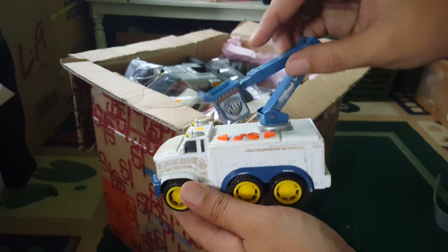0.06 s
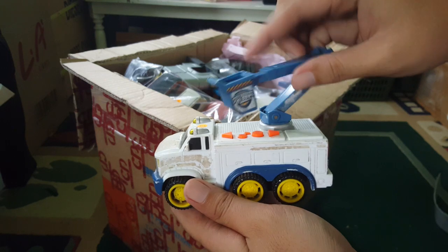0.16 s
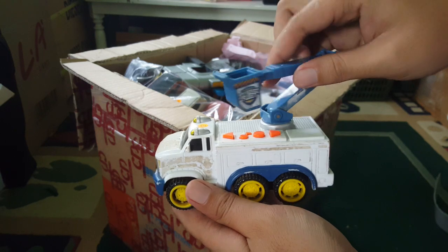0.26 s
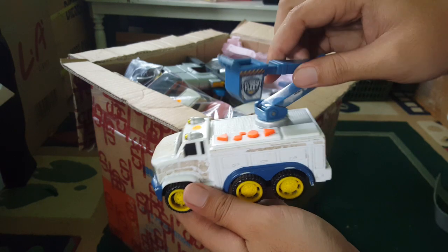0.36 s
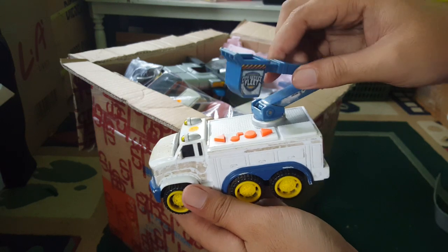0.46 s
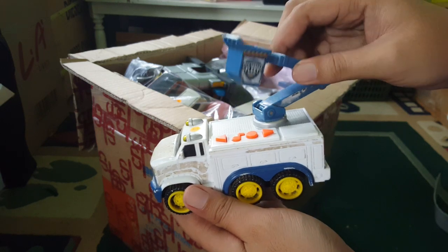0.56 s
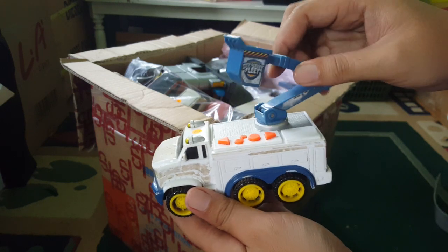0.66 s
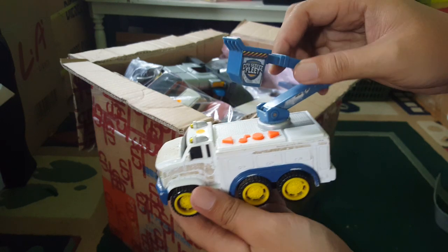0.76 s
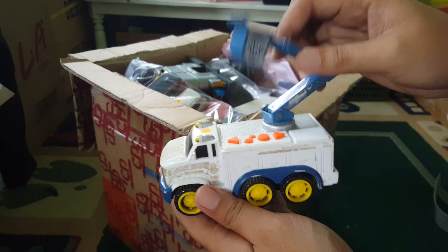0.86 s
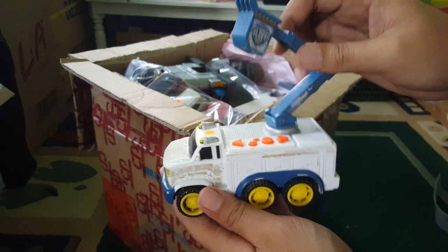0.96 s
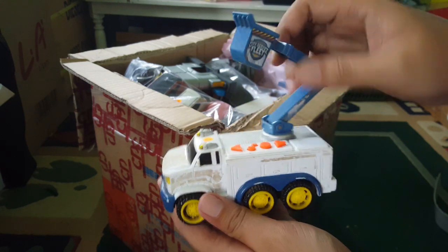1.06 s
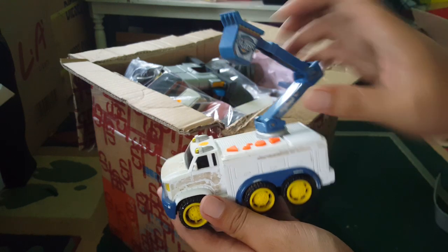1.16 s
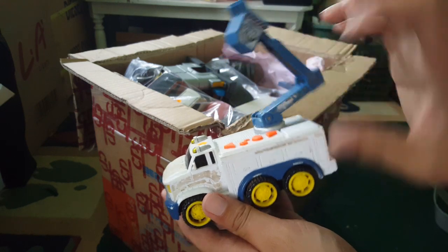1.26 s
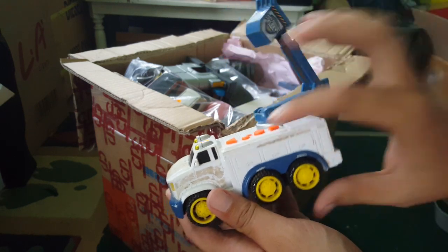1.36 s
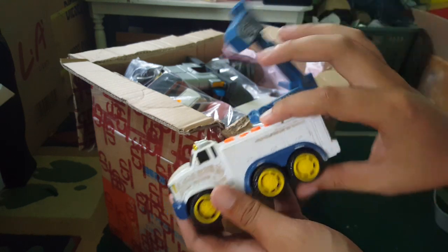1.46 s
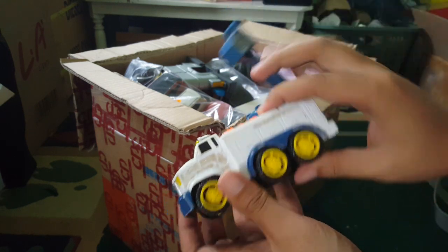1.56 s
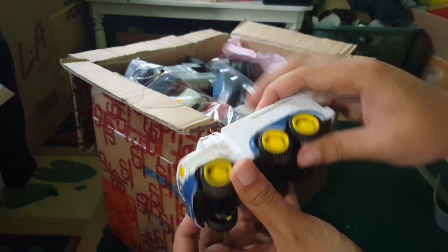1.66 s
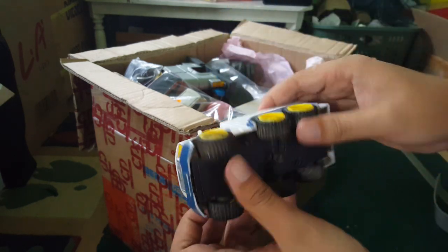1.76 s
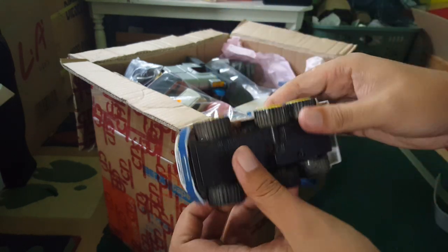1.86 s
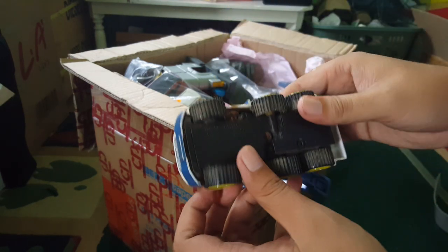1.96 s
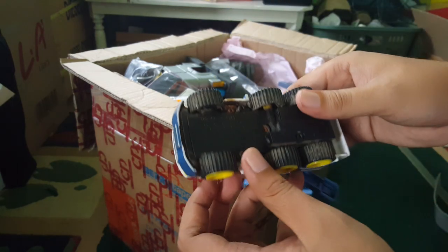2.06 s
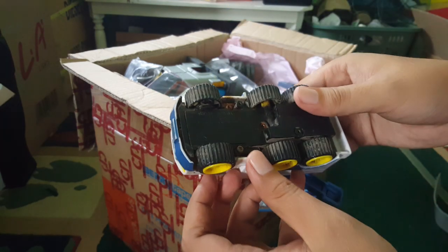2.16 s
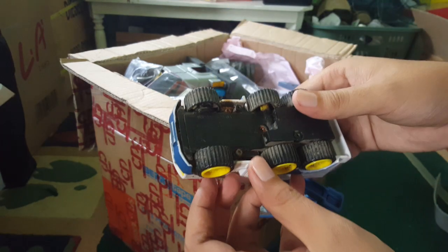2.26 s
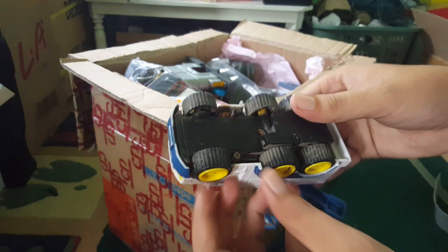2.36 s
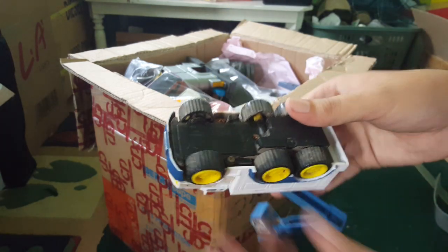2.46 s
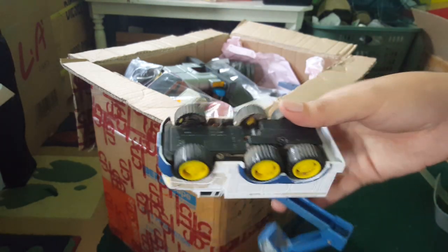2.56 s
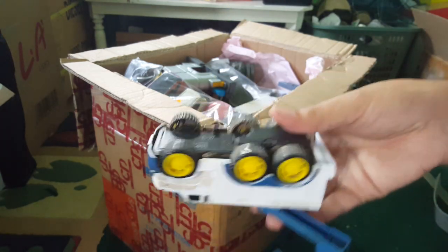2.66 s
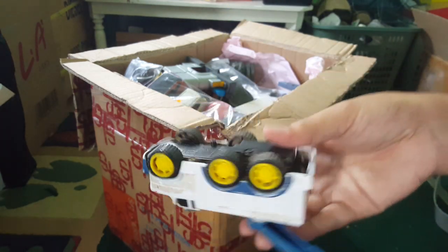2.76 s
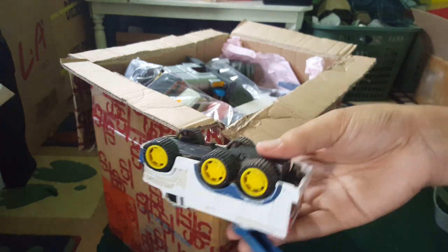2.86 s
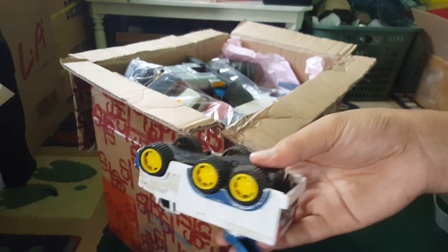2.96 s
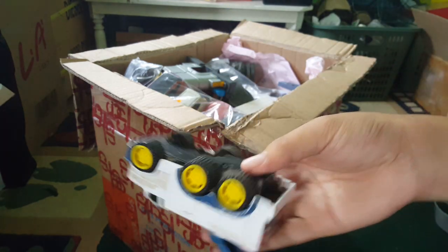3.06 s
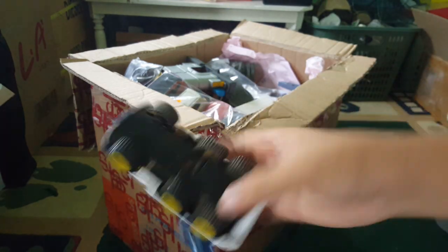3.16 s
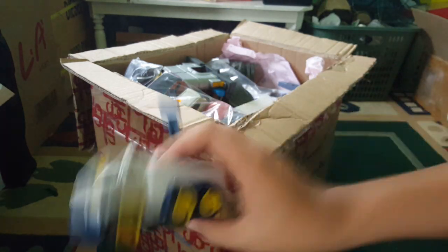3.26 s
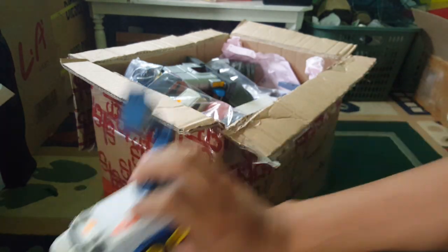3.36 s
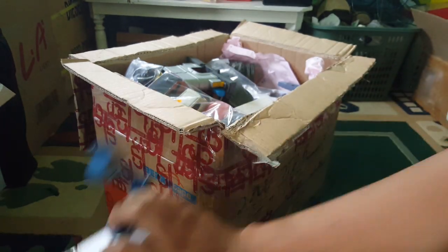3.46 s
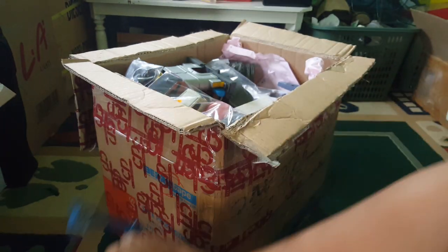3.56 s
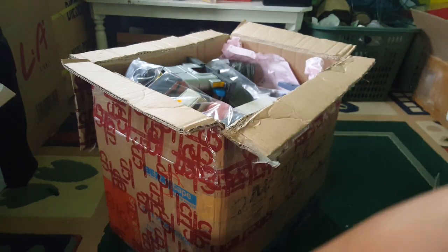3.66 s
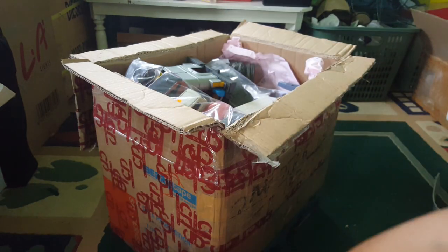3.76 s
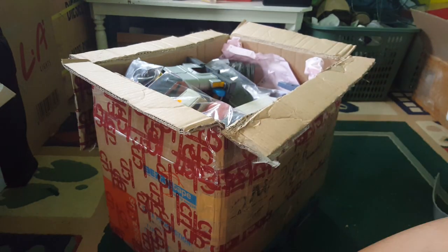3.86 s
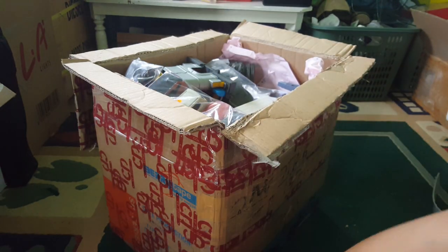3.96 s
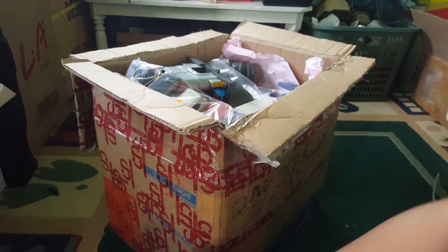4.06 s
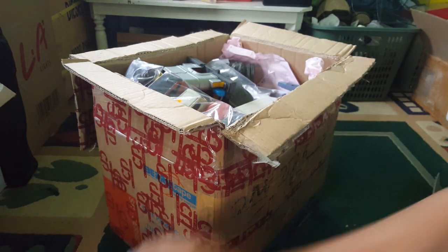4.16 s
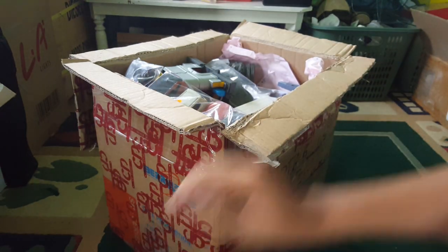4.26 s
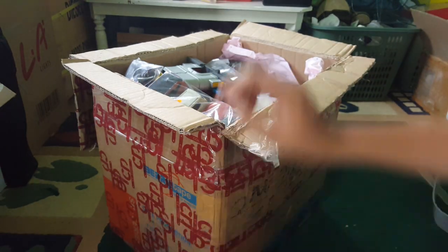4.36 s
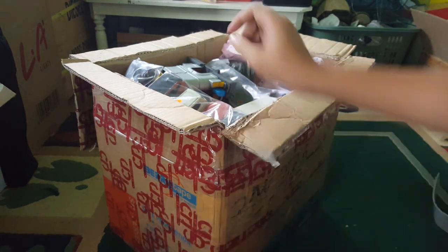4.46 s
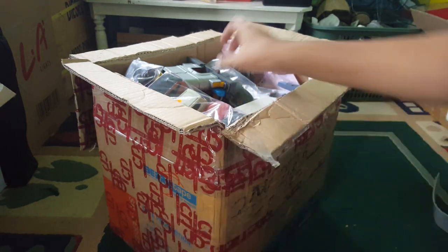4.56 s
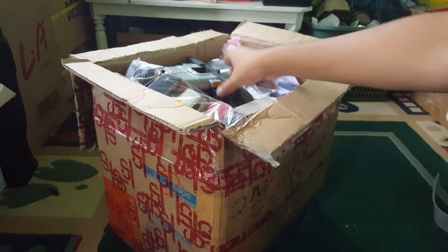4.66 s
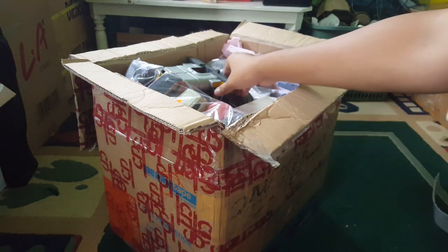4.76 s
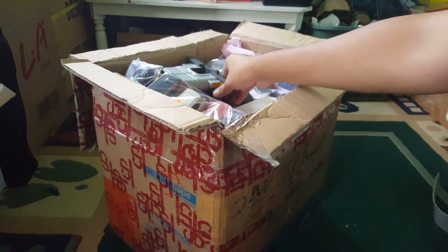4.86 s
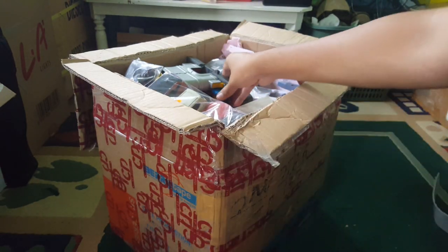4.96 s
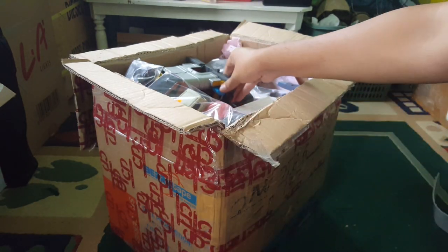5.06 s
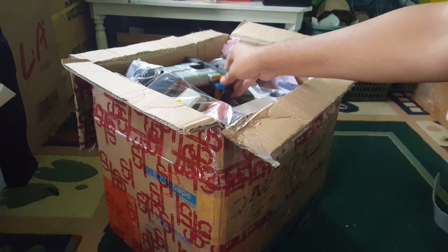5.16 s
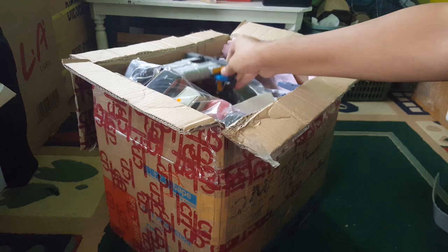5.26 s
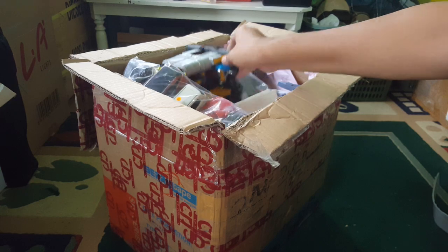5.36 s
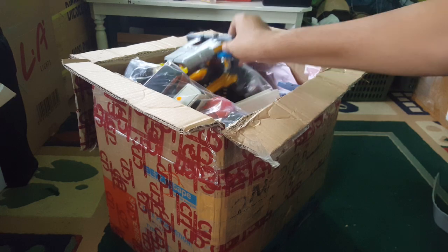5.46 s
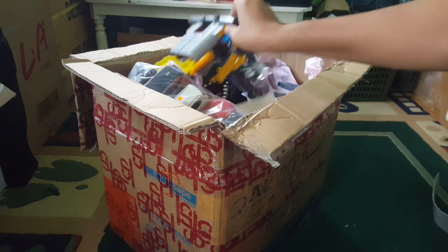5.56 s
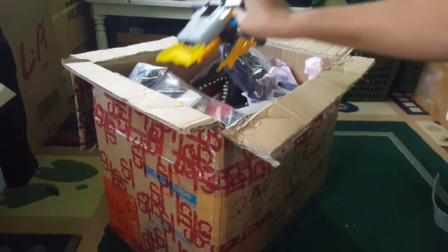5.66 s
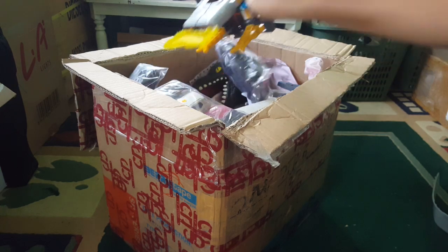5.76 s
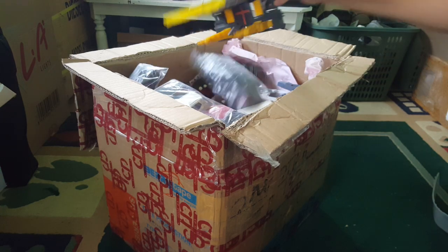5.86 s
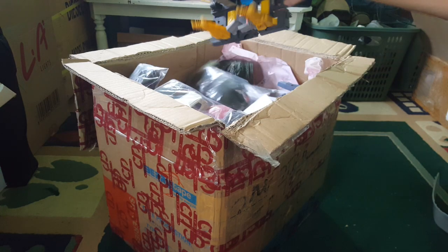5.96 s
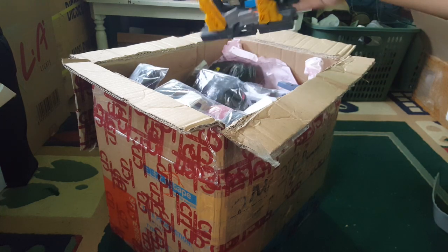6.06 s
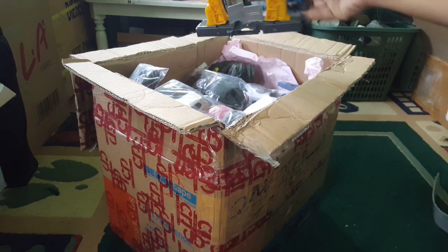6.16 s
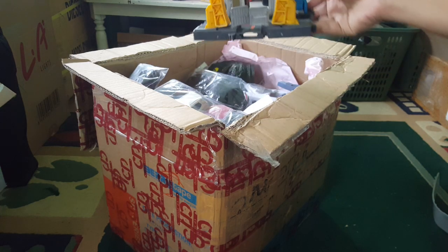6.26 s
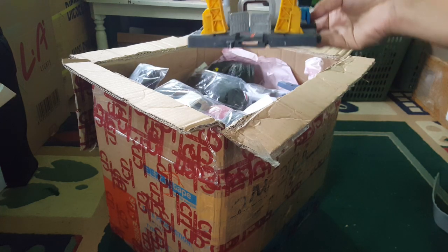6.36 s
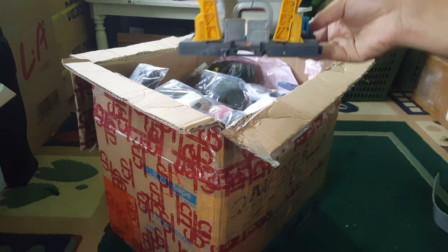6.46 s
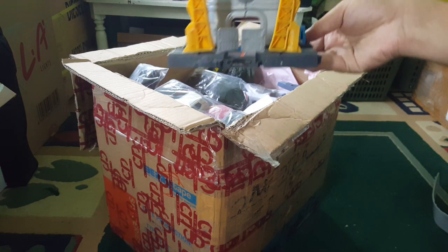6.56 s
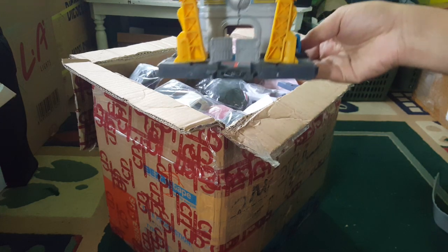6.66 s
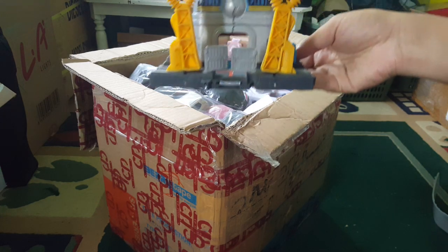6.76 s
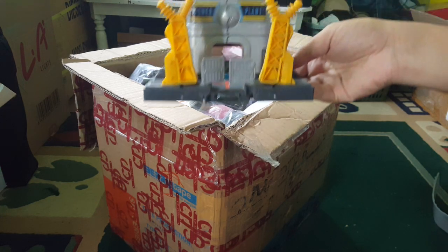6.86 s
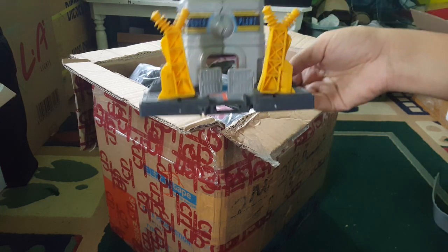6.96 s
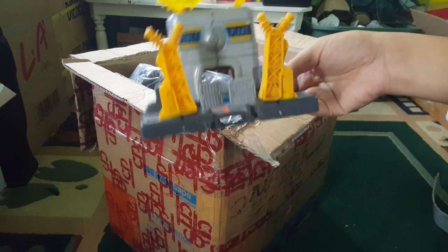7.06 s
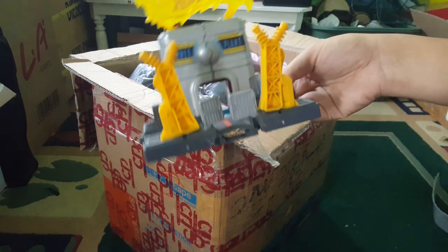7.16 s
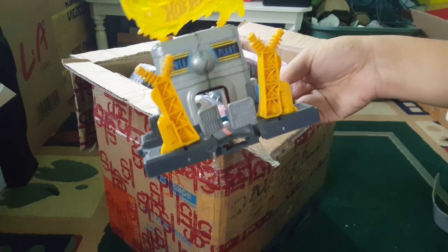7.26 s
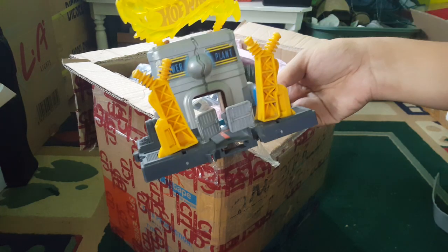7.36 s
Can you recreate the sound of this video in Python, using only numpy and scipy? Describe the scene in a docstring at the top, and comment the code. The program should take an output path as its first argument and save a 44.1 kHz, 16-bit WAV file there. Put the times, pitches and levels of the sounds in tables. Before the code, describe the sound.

Plastic toy parts rattle and clatter down in a quiet room, followed by rustling plastic bags and knocks against a cardboard box.

```python
"""A quiet carpeted room with a distant rumble; two microphones a hand apart. From the start, left of
centre, two hands turn a hollow plastic truck: parts clack and rattle, fingers rub, and near 1.8 s a
loose piece slides inside. Near 4 s it is set down with a thump and its steel axle pings. From 4.7 s a
larger toy scrapes out of a cardboard box past crackling plastic bags, knocking the box hardest at 6 s.
Two faint knocks follow near 7.3 s."""
import sys
import numpy as np
from scipy import signal
from scipy.fft import rfft, irfft
from scipy.io import wavfile
from scipy.ndimage import uniform_filter1d

SR = 44100
rng = np.random.default_rng(int(sys.argv[2]) if len(sys.argv) > 2 else 0)


def to_wav(sig):
    """Store sig (one row per channel, or 1-D mono) as 16-bit WAV at the path in sys.argv[1].

    Samples outside -1..1 are clipped; the rate is SR.
    """
    pcm = np.clip(np.atleast_2d(sig), -1, 1) * 32767
    pcm = np.round(pcm).astype(np.int16)
    wavfile.write(sys.argv[1], SR, pcm.T)  # frames by channels


N = 326340  # 7.4 s
MIC_SPACING_M = 0.16


def gain_of(db):
    """Decibels to an amplitude factor."""
    return 10 ** (np.asarray(db) / 20)


def unit_rms(x):
    """Scaled to rms 1."""
    return x / np.sqrt(np.mean(x ** 2) + 1e-20)


def at_hz(points, hz):
    """A table over frequency, joined on a log axis."""
    f, value = np.transpose(points)
    return np.interp(np.log(hz + 1), np.log(f + 1), value)


def curve_db(rows, column):
    """One column of a table over time, -120 dB outside its span."""
    rows = np.vstack(rows)
    return np.interp(np.arange(N) / SR, rows[:, 0], rows[:, column], -120, -120)


def coloured(x, spectrum):
    """Filtered by rows of (frequency [Hz], level [dB]), then scaled to rms 1."""
    hz = np.fft.rfftfreq(x.shape[-1], 1 / SR)
    return unit_rms(irfft(rfft(x) * gain_of(at_hz(spectrum, hz)), x.shape[-1]))


def resonance(x, hz, width_hz):
    """One mode rung by x, rms 1."""
    r = np.exp(-np.pi * width_hz / SR)
    return unit_rms(signal.lfilter([1, 0, -1], [1, -2 * r * np.cos(2 * np.pi * hz / SR), r * r], x))


def grains(per_s, spread_db):
    """Sparse clicks, a few of them large."""
    size = gain_of(spread_db * np.minimum(rng.exponential(1, N), 4)) * rng.choice([-1, 1], N)
    return size * (rng.random(N) < per_s / SR)


def diffuse(x):
    """Sound from all sides: the microphones agree as sinc of spacing over wavelength."""
    left, other = rfft(x)
    coherence = np.sinc(2 * np.fft.rfftfreq(x.shape[1], 1 / SR) * MIC_SPACING_M / 343)
    right = coherence * left + np.sqrt(1 - coherence ** 2) * other
    return irfft(np.array([left, right]), x.shape[1])


# Hiss of the still room: (frequency [Hz], level [dB])
HISS_SPECTRUM = [(110, -53), (180, -24), (267, 1.5), (360, -5.5), (477, -39), (505, -21), (763, -43),
                 (903, -5.5), (1090, -18.5), (3820, -13.5), (6710, -33.5), (15900, -27.5)]
# Room modes fed by distant rumble: (frequency [Hz], width [Hz], level [dB])
ROOM_MODES = [(33.4, 31, -8.5), (82.1, 15, -1), (142.2, 21, 0.5), (264, 27, -13.5)]
# Background from far off: (time [s], rumble [dB], hush [dB])
BACKGROUND = [(0.0, -56.5, -68), (1.05, -60, -68.5), (1.81, -54, -70.5), (2.82, -61, -66.5),
              (3.17, -55.5, -61.5), (3.56, -58.5, -68), (4.1, -56, -57.5), (4.72, -55, -63),
              (5.46, -54, -60), (6.04, -49.5, -59), (6.25, -52.5, -61.5), (7.4, -52, -61)]


def room_tone():
    """Steady hiss and deep flutter, a wavering rumble in the room modes, a hush that comes and goes."""
    def noise():
        return rng.standard_normal((2, N))
    hiss = gain_of(-69) * coloured(noise(), HISS_SPECTRUM)
    rumble = unit_rms(sum(gain_of(db) * resonance(noise(), hz, width) for hz, width, db in ROOM_MODES))
    rumble *= gain_of(curve_db(BACKGROUND, 1))
    hush = coloured(noise(), [(150, -35), (300, 8.5), (900, 0.5), (2500, -14), (6000, -26.5)])
    hush *= gain_of(curve_db(BACKGROUND, 2))
    flutter = gain_of(-79) * coloured(noise(), [(15, -6), (35, 6), (110, -7), (250, -57)])
    return flutter + diffuse(hiss + rumble + hush)  # each microphone has its own flutter


def small_contacts(modes, per_s, spread_db, centre_hz, db_per_octave):
    """Random soft contacts, each ringing the modes around centre_hz in its own mix; rms near 1."""
    clicks = unit_rms(grains(per_s, spread_db))
    soften = signal.butter(2, 6100, fs=SR, output="sos")
    weights = [gain_of(-db_per_octave * abs(np.log2(hz / centre_hz)) + db) for hz, db, _ in modes]
    out = 0
    for weight, (hz, _, t60) in zip(weights, modes):
        drive = signal.sosfilt(soften, clicks * rng.normal(1, 1, (2, N)))
        out += weight * resonance(drive, hz, width_hz=1.96 / t60)
    return out / np.linalg.norm(weights)


def stirred(handling_db, strikes, shake_db, t60):
    """Gain of the handling plus a dying shake that starts at shake_db relative to each blow."""
    kicks = np.zeros(N)
    starts, db = np.transpose(strikes)[:2]
    np.add.at(kicks, np.round(starts * SR).astype(int), gain_of(db + shake_db) ** 2)
    shake_power = signal.lfilter([1], [1, -gain_of(-120 / (t60 * SR))], kicks)
    return np.sqrt(gain_of(handling_db) ** 2 + shake_power)


# Modes of the plastic truck: (frequency [Hz], energy [dB], t60 [s])
TRUCK_MODES = [(850, -3, .018), (950, -3, .022), (1070, -3, .022), (1185, 0, .03), (1300, -3, .022),
               (1400, -3, .02), (1630, -4, .014), (1750, -5, .012), (1960, -4, .01), (2230, -3, .01),
               (2500, -6, .007), (2750, -7, .007), (3120, -6, .006), (3490, -6, .005), (4000, -5, .005),
               (4500, -8, .004), (5100, -7, .004), (5640, -9, .003), (6500, -11, .003)]
# The truck in the hands: (time [s], rattle [dB], finger rub [dB])
HANDLING = [(0.0, -63.5, -70.5), (0.48, -92, -78), (1.19, -79, -73.5), (1.64, -73, -75), (1.76, -65, -66),
            (1.93, -65, -62.5), (2.05, -68, -60.5), (2.2, -77.5, -84), (2.52, -75.5, -71), (2.83, -78, -71),
            (3.05, -71, -71), (3.46, -74, -80), (3.84, -70, -76), (4.05, -62, -65), (4.1, -55.5, -53),
            (4.28, -65, -68), (4.37, -52.5, -59.5), (4.48, -78.5, -63), (4.7, -93.5, -94)]


def truck_rattle():
    """Loose parts jiggle against the shell as it turns and after every clack."""
    rattle = small_contacts(TRUCK_MODES, per_s=300, spread_db=4.9, centre_hz=1250, db_per_octave=11)
    return rattle * stirred(curve_db(HANDLING, 1), TRUCK_CLACKS, shake_db=-23.5, t60=0.26)


def snaps(spectrum, per_s, spread_db, clump_db):
    """Tiny snaps in clumps, spread wide across the microphone pair."""
    clumps = gain_of(clump_db * unit_rms(uniform_filter1d(rng.standard_normal(N), 300)))
    middle, left, right = (grains(per_s, spread_db) * clumps for _ in range(3))
    return coloured(middle + 2.4 * np.array([left, right]), spectrum)


# Skin on plastic: (frequency [Hz], level [dB])
RUB_SPECTRUM = [(1180, -26), (2000, -2.5), (2880, 0), (3450, -7.5), (4210, -5.5), (6890, -7.5),
                (10100, -14.5), (15800, -19)]


def finger_rub():
    """Fingers rub over the shell in a dense run of tiny slips."""
    return snaps(RUB_SPECTRUM, per_s=5000, spread_db=2, clump_db=3) * gain_of(curve_db(HANDLING, 2))


# Tick of a bare contact: (frequency [Hz], level [dB])
TICK_SPECTRUM = [(3500, -25), (6500, -3), (8500, 1), (10200, -18), (12500, -15), (14700, -11), (16000, -17)]


def blows(strikes, modes, split_hz, low_cut_hz, db_per_octave, tick_db, tick_per_hardness):
    """Each blow is a swelling chatter: it rings low modes near its pitch, upper modes and bare ticks."""
    out, t = np.zeros((2, N + SR)), np.arange(2500) / SR
    mode_hz, mode_db, t60 = np.transpose(modes)[:, :, None]
    tick = np.fft.fftshift(coloured(np.eye(1, 128)[0], TICK_SPECTRUM))
    ticks = np.array([tick, np.roll(tick, 3)])
    low_cut = signal.butter(4, low_cut_hz, "high", fs=SR, output="sos")  # small bodies radiate no bass
    for start, db, hz, hardness_db, chatter_ms in strikes:
        draws = rng.random((4, len(modes), 1))
        strength, detune, phases = draws[0], draws[1], draws[2:]
        force, gate = rng.standard_normal((2, len(t)))
        swell = t * 1000 / chatter_ms + 0.38
        chatter = force * (abs(gate) > 1.6) * swell * np.exp(-swell)
        push = 0.66 * chatter / abs(chatter).max() + 0.69 * (t == 0)
        # Each spot and grip shifts the modes; each microphone faces another side of the body.
        pitch = mode_hz * (1 + 0.078 * (detune - 0.5) * np.log2(mode_hz / 300))
        pitch[np.argmin(abs(mode_hz - hz))] = hz
        angle = 2 * np.pi * pitch * t + phases * np.minimum(mode_hz / 1300, 6)
        rings = gain_of(mode_db + 6 * strength - 60 * t / t60) * np.sin(angle) / np.sqrt(t60)
        nearness = gain_of(-db_per_octave * abs(np.log2(mode_hz / hz)))
        low = ((mode_hz < split_hz) * nearness * rings).sum(1)
        low *= 1 - np.exp(-t * hz * 4.15)  # the low modes take a moment to build
        upper = ((mode_hz >= split_hz) * rings).sum(1)
        for response, drive, peak_db in ((low, push, db), (upper, chatter, db + hardness_db),
                                         (ticks, chatter, db + tick_db + tick_per_hardness * hardness_db)):
            sound = signal.sosfilt(low_cut, signal.fftconvolve(drive[None], response, axes=1))
            sound *= gain_of(peak_db) / abs(sound).max()
            out[:, round(start * SR):][:, :sound.shape[1]] += sound
    return out[:, :N]


# Truck parts meeting; hardness is the peak of the upper modes against that of the low ones:
# (time [s], level [dB], pitch [Hz], hardness [dB], chatter [ms])
TRUCK_CLACKS = [(0.014,-44.5,1160,-15,1.8),(0.207,-53,1150,10.5,2.7),(0.286,-51,1190,-18,2.9),(0.335,-40.5,970,-0.5,2.4),(0.708,-52,910,-21,2),(1.06,-43.5,895,-25,0.81),(1.124,-51.5,1150,2.5,2.7),(1.173,-53.5,1260,1,5.8),(1.193,-53.5,1150,-2,2.3),(1.368,-40.5,1200,-2,1.9),(1.394,-47,888,3.5,1.7),(1.442,-48,1140,-2,1.4),(1.535,-19.5,1197,-4,1),(1.572,-45,1240,-5,2.6),(1.597,-35,1310,5.5,1.4),(1.61,-43,1250,-21,2.2),(1.651,-40,1220,-26,4.8),(1.712,-28,1693,-14,1.7),(1.733,-35.5,1160,-18,5),(1.76,-33.5,940,-22,2.7),(1.78,-46,1055,-31,1.8),(1.797,-32.5,1124,-20,3),(1.806,-38.5,1260,3,1.4),(1.826,-26,1200,-1,0.91),(1.897,-40,1090,7,1.2),(1.983,-49.5,1155,-1,4.6),(2.037,-46.5,1060,10.5,2.5),(2.076,-46.5,1016,-8,3.4),(2.097,-50,800,-4,1.8),(2.378,-49,1065,-20,3.7),(2.421,-51,1030,-22,1.8),(2.854,-52,1390,7,5),(2.874,-48.5,1100,-20,1.1),(2.939,-41,1220,-11,1.1),(2.995,-51,1975,6,1.5),(3.252,-45,1200,-9,2.6),(3.291,-36.5,1430,-4,3),(3.297,-28,862,-8.5,2.6),(3.32,-46,1320,-22,2.5),(3.447,-41.5,1970,-22,9.2),(3.478,-40.5,1180,3,4.1),(3.511,-43,875,-20,1.6),(3.546,-47,1240,-25,1.7),(3.619,-41,1400,-16,2.9),(3.653,-44.5,948,-24,1.8),(3.669,-49,1270,-25,3),(3.696,-46,1132,-23,1.6),(3.766,-40,1232,-15,1.7),(3.83,-39.5,1440,-19,2.6),(3.916,-21,1094,-1,2.4),(3.955,-22,1700,-15,1.3),(4.004,-36.5,1690,-19,3.2),(4.035,-29,1344,-1.5,2.9),(4.062,-19.5,1590,4.5,4.9),(4.07,-12.5,2290,-6.5,2.6),(4.183,-31,1705,-7,3.4),(4.2,-35.5,1860,2.5,2.8),(4.257,-36.5,1920,3.5,5.3),(4.27,-35.5,1410,-21,4.3),(4.3,-35.5,1305,-28,3),(4.352,-31.5,1950,-12,0.89),(4.378,-23.5,1910,-9,3.2),(4.434,-31.5,1020,2.5,1.4),(4.474,-42,2140,11,1.9)]


def truck_clacks():
    """Plastic parts strike and ring the hollow shell, loudest as it lands."""
    return blows(TRUCK_CLACKS, TRUCK_MODES, split_hz=2900, low_cut_hz=1130, db_per_octave=13,
                 tick_db=-17, tick_per_hardness=0.59)


# Air inside the truck: (frequency [Hz], width [Hz], level [dB])
CAVITY_MODES = [(1100, 93, 3), (1240, 150, -8)]
# The sliding part: (time [s], level [dB])
SLIDE_LEVEL = [(1.7, -71), (1.72, -60), (1.81, -56), (1.85, -44), (2.06, -78)]


def sliding_part():
    """A loose part slides as the truck tips; its slips ring the air in the body."""
    slips = grains(per_s=660, spread_db=2.2)
    cavity = sum(gain_of(db) * resonance(slips, hz, width) for hz, width, db in CAVITY_MODES)
    return unit_rms(cavity) * gain_of(curve_db(SLIDE_LEVEL, 1))


# Dull thumps through floor and box: (time [s], level [dB], pitch [Hz])
LOW_THUMPS = [(1.847, -43, 136), (2.994, -46.5, 64), (3.912, -45, 282), (4.065, -37, 96.4),
              (4.078, -43, 76), (4.433, -35.5, 232), (4.755, -42, 234), (5.74, -35, 189), (5.979, -36, 250),
              (5.987, -31, 85), (6.059, -35, 134)]


def thumps(cycles_to_t60=10.3):
    """Floor and box give low damped swings with a soft start."""
    out, t = np.zeros(N + SR), np.arange(SR // 2) / SR
    attack = 1 - np.exp(-t / 0.0012)
    for start, db, hz in LOW_THUMPS:
        swing = gain_of(db - 60 * t * hz / cycles_to_t60) * attack * np.sin(2 * np.pi * hz * t)
        out[round(start * SR):][:len(t)] += swing
    return out[:N]


# Modes of the thin steel axle: (frequency [Hz], level [dB], t60 [s])
AXLE_MODES = [(14650, -17, 0.14), (15010, 0, 0.022), (15150, -34, 0.4)]


def axle_ping(start_s=4.064, peak_db=-37):
    """The axle rings once, short and high, at the truck's hardest landing."""
    t = np.maximum(np.arange(N) / SR - start_s, 0)
    ping = sum(gain_of(db - 60 * t / t60) * np.sin(2 * np.pi * hz * t) for hz, db, t60 in AXLE_MODES)
    return gain_of(peak_db) * ping / abs(ping).max()


# Modes of the cardboard box: (frequency [Hz], energy [dB], t60 [s])
BOX_MODES = [(233, -8, .04), (365, -7, .02), (450, -2, .022), (570, 0, .026), (690, -3, .018),
             (775, -3, .018), (920, -3, .014), (1100, -3, .014), (1340, -2, .012), (1530, -1, .012),
             (1700, -3, .01), (1930, -4, .008), (2440, -5, .006), (2740, -3, .006), (3430, -6, .005),
             (3980, -7, .004), (5200, -10, .003)]
# Dragging the larger toy out: (time [s], scrape [dB], bag crackle [dB])
DRAG = [(4.7, -83.5, -76), (4.86, -62, -72), (5.03, -67.5, -63.5), (5.22, -54, -56.5), (5.55, -52, -48.5),
        (5.63, -58, -44.5), (5.72, -37, -47.5), (5.85, -55.5, -57.5), (5.92, -58.5, -47.5),
        (5.97, -37.5, -41.5), (6.0, -53, -43), (6.12, -51, -54.5), (6.18, -57.5, -64), (6.38, -86, -88)]


def cardboard_scrape():
    """The toy sticks and slips on the cardboard, which shakes on after every knock."""
    scrape = small_contacts(BOX_MODES, per_s=900, spread_db=1.5, centre_hz=756, db_per_octave=1.45)
    return scrape * stirred(curve_db(DRAG, 1), BOX_KNOCKS, shake_db=-16.5, t60=0.19)


# Plastic film: (frequency [Hz], level [dB])
BAG_SPECTRUM = [(710, -12), (1200, -1.5), (1660, -5.5), (2320, -3.5), (3740, -7.5), (8720, -9),
                (10000, -17), (12700, -14.5), (16000, -20)]


def bag_crackle():
    """Creases in the bags snap as the toy pushes past."""
    return snaps(BAG_SPECTRUM, per_s=2500, spread_db=3.9, clump_db=4) * gain_of(curve_db(DRAG, 2))


# The larger toy against the box: (time [s], level [dB], pitch [Hz], hardness [dB], chatter [ms])
BOX_KNOCKS = [(4.756,-32,765,-13.5,3.7),(4.88,-40.5,368,-3.5,1.8),(4.906,-49,790,-18,2.2),(4.929,-43,670,-19,2.5),(4.982,-50,575,9.5,2.3),(5.076,-45.5,565,0,3),(5.262,-47.5,630,12.5,7.3),(5.319,-44,452,11,3.3),(5.374,-35.5,1660,-13,2.5),(5.618,-32.5,1460,-3,6),(5.631,-30.5,1510,-10,3.2),(5.645,-34,1500,-18,2.6),(5.675,-40,490,-14,2.6),(5.718,-26.5,490,-21,2.2),(5.737,-23.5,780,-1,6.3),(5.891,-51,480,6,3.6),(5.937,-44,580,6,3.3),(5.976,-7.5,571,-6.5,3.1),(6.009,-25.5,560,-11,2.2),(6.055,-30,377,2,3),(6.074,-29,925,-1.5,3.6),(6.109,-40,477,-9,3.4),(6.197,-42.5,405,0,3.5),(6.398,-51.5,340,9.5,1.8),(7.289,-43,843,-25,2.1),(7.313,-47.5,300,-1.5,1.8)]


def box_knocks():
    """The toy strikes the cardboard walls, which ring lower than the truck."""
    return blows(BOX_KNOCKS, BOX_MODES, split_hz=2300, low_cut_hz=192, db_per_octave=23,
                 tick_db=-8, tick_per_hardness=0.8)


# Decay of the carpeted room: (frequency [Hz], t60 [s])
ROOM_DECAY = [(100, 0.43), (500, 0.12), (1500, 0.17), (5000, 0.16), (15000, 0.048)]


def room_reverb(x):
    """Sparse reflections, each band dying at its own speed."""
    out, turn = 0, 2 * np.pi * 3.1 * np.arange(N) / SR
    for k in range(3):  # three tails take turns so the room's echo does not ring at the same pitches
        taps = np.zeros((2, SR // 2))
        slots = np.arange(160, SR // 2 - 20, 20)
        arrivals = slots + rng.integers(0, 20, (2, len(slots)))
        np.put_along_axis(taps, arrivals, rng.choice([-1., 1.], arrivals.shape), 1)
        hz, t, bands = signal.stft(diffuse(taps), SR, nperseg=256)
        decay = gain_of(-60 * t / at_hz(ROOM_DECAY, hz)[:, None])
        tail = signal.istft(bands * decay, SR, nperseg=256)[1]
        tail /= np.linalg.norm(tail[0])
        share = np.sqrt(2 / 3) * np.cos(turn + k * np.pi / 3)
        out += signal.fftconvolve((x * share)[None], tail, axes=1)[:, :N]
    return out


# Where the toys are, heard from the microphones: (time [s], left over right [dB], reverb send [dB])
TOY_POSITION = [(0, 1, -10.5), (2.8, 1, -11.5), (3.6, 7.5, -3.5), (3.9, 5.5, -3), (4.4, 2.5, -7),
                (5.6, 2, -5), (5.95, 1.5, -9), (7.4, 0, -7)]


def scene():
    """The toys reach the nearer, left microphone first and louder; thumps sit centre; the room answers."""
    truck = truck_rattle() + sliding_part() + finger_rub() + truck_clacks() + axle_ping()
    toys = truck + cardboard_scrape() + bag_crackle() + box_knocks()
    thuds = thumps()
    side_db = curve_db(TOY_POSITION, 1)
    right_lag_us = 32 + 19 * side_db
    delayed = np.arange(N) - np.round(right_lag_us * SR / 1e6).astype(int)
    left = toys[0] * gain_of(side_db / 2)
    right = toys[1][np.clip(delayed, 0, N - 1)] * gain_of(-side_db / 2)
    reverb = room_reverb((toys.mean(0) + thuds) * gain_of(curve_db(TOY_POSITION, 2)))
    return np.array([left, right]) + thuds + reverb + room_tone()


def record(dry):
    """Both microphone channels cut off steeply at 16 kHz."""
    return signal.oaconvolve(dry, signal.firwin(511, 16000, window=("kaiser", 9), fs=SR)[None], "same")


dry = scene()
out = record(dry)
to_wav(out)
```